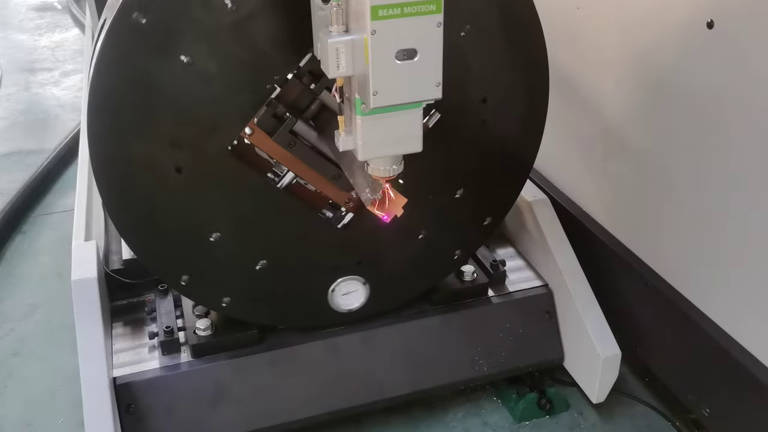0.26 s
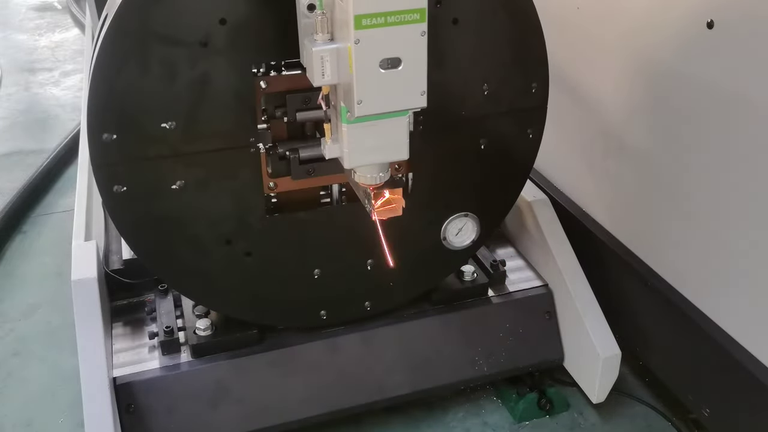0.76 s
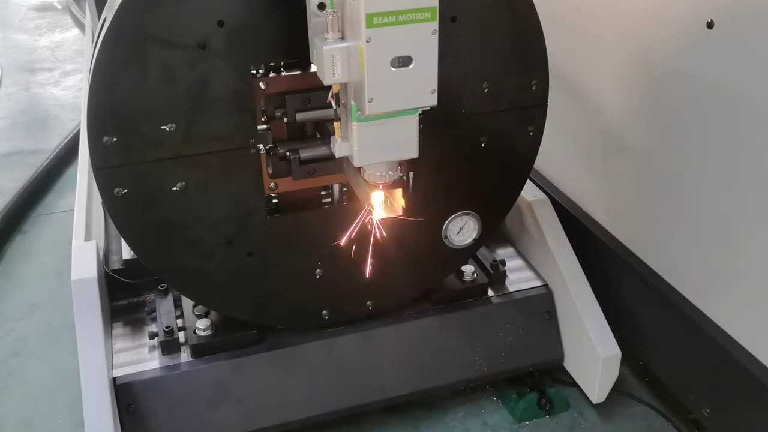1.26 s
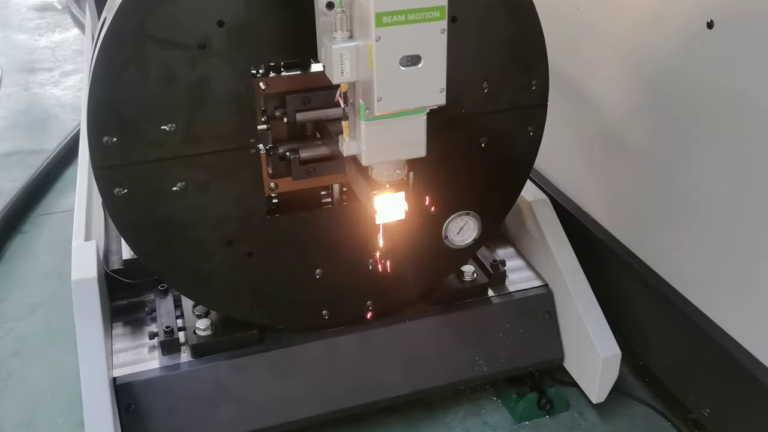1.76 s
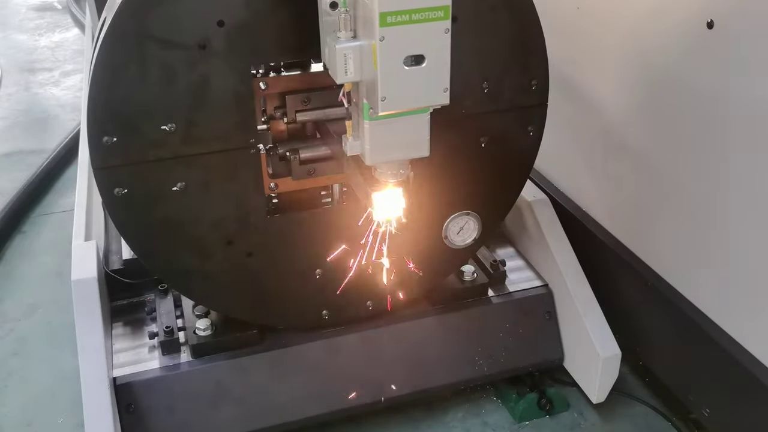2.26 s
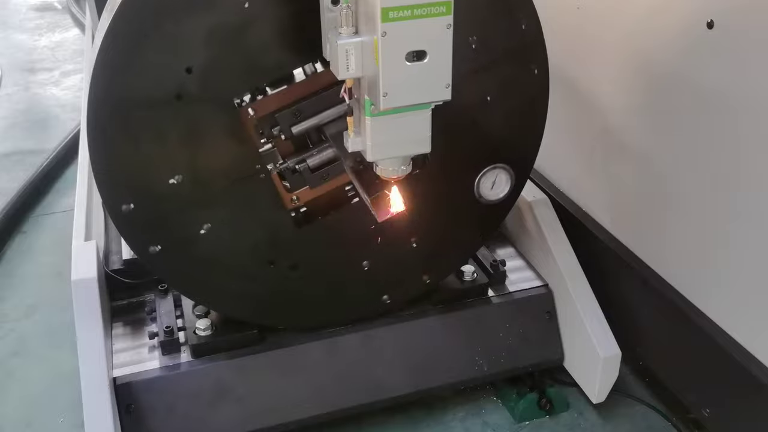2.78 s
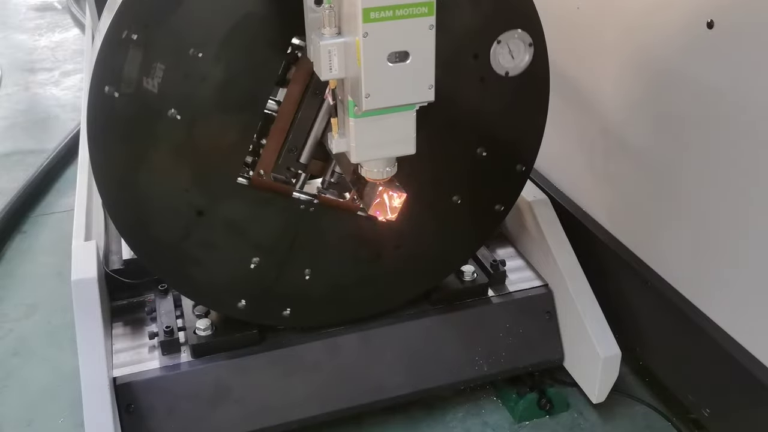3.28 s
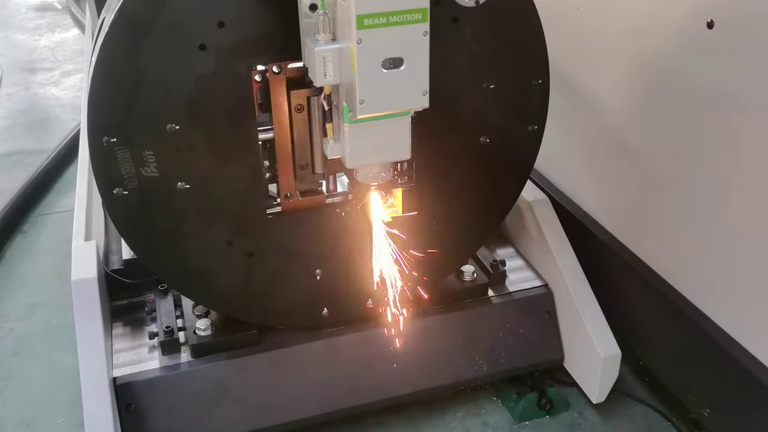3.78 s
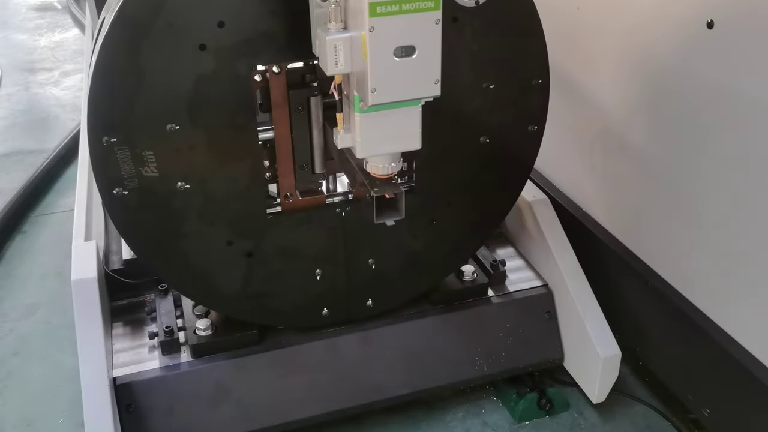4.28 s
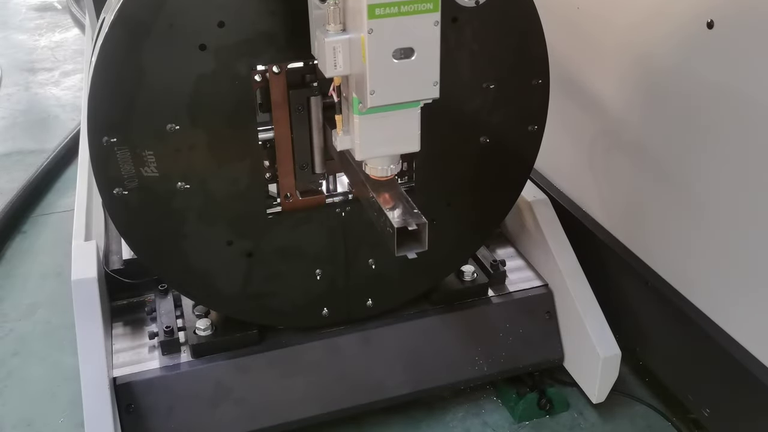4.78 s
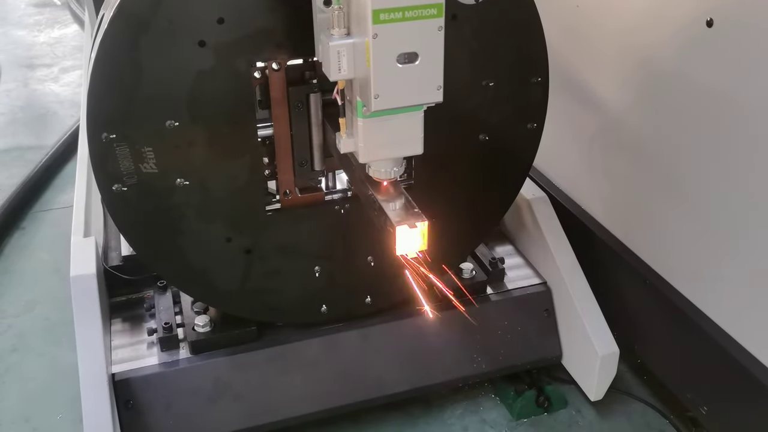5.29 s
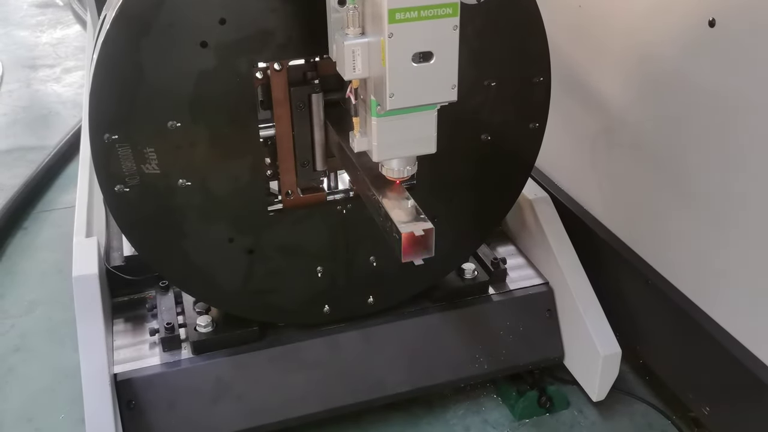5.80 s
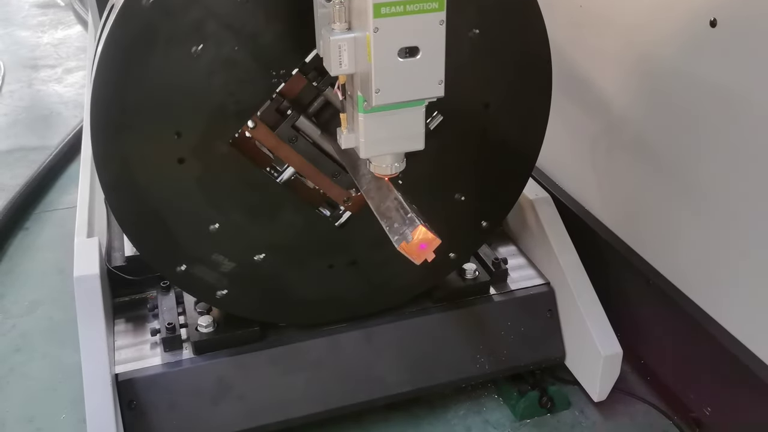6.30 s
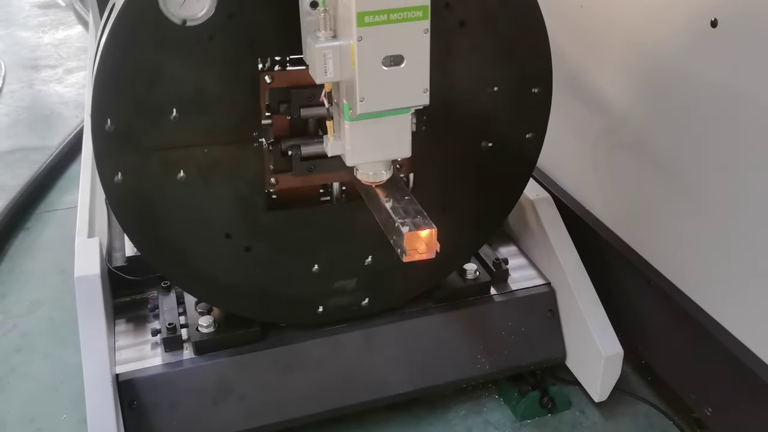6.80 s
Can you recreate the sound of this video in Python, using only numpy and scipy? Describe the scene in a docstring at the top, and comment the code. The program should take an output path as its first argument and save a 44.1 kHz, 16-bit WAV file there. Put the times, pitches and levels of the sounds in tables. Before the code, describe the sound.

Steady sharp gas hiss with a thin high whine, rumbling rushes of air on the right, and midway a small steel piece drops and rattles.

```python
"""Laser cutting of steel tube

A laser head cuts a turning square steel tube in a workshop, close to a phone with two microphones.
The gas jet is shaped noise that hisses on both sides, with a ring near 9 kHz on the left.
Gusts of low rush swell on the right, with a dark gap in the noise below a sliding edge.
A blast of air hits both microphones, then the cut piece drops and clatters: decaying sine modes
and noise cracks. Short puffs of filtered noise hit the right microphone."""
import sys
import numpy as np
from scipy import signal
from scipy.io import wavfile
from scipy.ndimage import uniform_filter1d

SR = 44100
rng = np.random.default_rng(int(sys.argv[2]) if len(sys.argv) > 2 else 0)


def output_pcm(signal):
    """Save a mono or channel-first signal as 16-bit PCM at the path in sys.argv[1].

    Samples are clipped to [-1, 1] before scaling.
    """
    pcm = np.clip(np.atleast_2d(signal).T, -1, 1) * 32767
    wavfile.write(sys.argv[1], SR, np.round(pcm).astype(np.int16))


def gain_from_db(level_db):
    """Convert decibel levels to linear amplitude factors (20 dB per decade)."""
    decades = np.asarray(level_db, float) / 20
    return 10 ** decades


N = 310905  # length in samples
HOP = 256  # half a short-time spectrum window, in samples

# strength of the gas jet close to the phone: time_s, level_db
JET_LEVEL = [(0, -32), (.15, -27.5), (.55, -28), (.91, -28), (1.03, -24), (2.3, -23.5), (2.7, -27.5),
             (2.83, -26.5), (2.88, -29.5), (3.4, -27), (3.75, -27.5), (3.83, -22), (4.08, -22), (4.14, -28),
             (4.42, -32.5), (4.78, -39.5), (4.9, -47.5), (4.96, -41.5), (5.04, -28), (5.21, -29.5),
             (5.6, -30), (5.68, -30.5), (5.71, -29), (6.0, -27), (6.13, -30), (6.67, -27), (6.86, -36),
             (6.91, -28.5), (7.04, -28)]
# broad hiss at each microphone, per kHz of band: pitch_hz, left_db, right_db
HISS_COLOUR = [(307, -40, -24.5), (1490, -14.5, -14), (3270, -10.5, -9.5), (4330, -7, -8),
               (5060, -10.5, -12.5), (6850, -7.5, -9.5), (9030, -0.5, -24), (9930, -11.5, -10),
               (12700, -7.5, -7), (16000, -11.5, -10)]
# spells of brighter hiss above the port's ring: start_s, end_s, boost_db
BRIGHT_SPELLS = [(.98, 2.85, 1.5), (3.8, 4.12, 1.5), (5.7, 6.05, 3.5)]
PORT_HZ, PORT_WIDTH_HZ = 8685, 1800  # ring of the left port, 6 dB down at the ends of its width
RING_OVER_JET_DB = 4.0
GUST_MASKS_DB = -2  # change of the broad hiss at the strongest gust


def jet():
    """Turbulence of the gas jet: broad hiss at both microphones, and a resonance of the left port."""
    hz, t, noise = spectra(turbulence(lean=0.03, flicker_db=0.61, flicker_s=0.03))
    jet_db = follow(JET_LEVEL, t)[0]
    gust = np.sqrt(gusts(t))
    hiss_db = jet_db + GUST_MASKS_DB * gust / gust.max()

    # surges of the jet are mostly treble, so the lower band rises less
    treble_from_hz = PORT_HZ + PORT_WIDTH_HZ / 2
    surge_db = np.maximum(hiss_db + 29, 0)
    lower_cut_db = 0.43 * np.outer(hz < treble_from_hz, surge_db)
    power = gain_from_db(read(HISS_COLOUR, hz) + hiss_db - lower_cut_db) ** 2
    bright_db = sum(db * ((t > start) & (t < end)) for start, end, db in BRIGHT_SPELLS)
    power *= gain_from_db(np.outer(hz > treble_from_hz, bright_db)) ** 2

    port = 1 / (1 + ((hz - PORT_HZ) / PORT_WIDTH_HZ * 2) ** 4)  # a flat-topped resonance
    ring_power = gain_from_db(RING_OVER_JET_DB + jet_db) ** 2
    power[0] += np.outer(port ** 2 * 1000 / PORT_WIDTH_HZ, ring_power)
    return sound(noise * np.sqrt(power))


# colour of the rush at each microphone, per kHz of band: pitch_hz, left_db, right_db
RUSH_COLOUR = [(20, -10, -26), (89, -3, 1), (980, -4, -1.5), (2500, -5.5, -1.5), (4480, -9.5, -3.5),
               (4560, -13, -8), (7200, -17.5, -11.5), (8800, -24, -24.5), (9260, -34, -16.5),
               (12000, -26, -11.5), (16100, -18, -12)]
# change of the right rush under the edge of the gap: pitch_hz, level_db
GAP_COLOUR = [(60, -3), (250, -8), (700, -18), (1300, -42), (4000, -37)]


def rush():
    """Buffeting air, strongest under 4.5 kHz; on the right a gap opens under a sliding edge."""
    hz, t, noise = spectra(turbulence(lean=0.14, flicker_db=1.27, flicker_s=0.023))
    # the right microphone shares a little of the left air, two samples later
    noise[1] += 0.19 * noise[0] * np.exp(-4j * np.pi * hz / SR)[:, None]
    power = draught(t) + blast(t)
    power[1] += gusts(t)
    level_db = read(RUSH_COLOUR, hz) + 10 * np.log10(power)[:, None]

    wobble = uniform_filter1d(rng.standard_normal(len(t)), size=7)
    edge_hz = gap_edge(t)
    ragged_hz = edge_hz + np.minimum(edge_hz, 1500) * 0.17 * wobble
    under = np.clip((ragged_hz - hz[:, None]) / 220, 0, 1)  # the gap is full 220 Hz below its edge
    level_db[1] += under * read(GAP_COLOUR, hz)[0]
    left, right = noise * gain_from_db(level_db)
    right = right + gain_from_db(-8.5) * under * left  # the left rush fills the gap
    return sound(np.array([left, right]))


# climbs of the gap's edge at the right microphone: start_s, top_s, end_s, top_hz
EDGE_CLIMBS = [(.33, .74, .76, 2650), (1.15, 1.3, 1.35, 2050), (1.37, 1.63, 1.66, 2100),
               (2.56, 2.84, 2.87, 3300), (3.1, 3.17, 3.27, 2250), (3.24, 3.34, 3.44, 3900),
               (3.47, 3.52, 3.54, 2370), (3.9, 3.97, 4.2, 1780), (4.9, 5.18, 5.42, 2150),
               (5.44, 5.56, 5.58, 2050), (5.6, 5.67, 5.7, 2250), (6.12, 6.26, 6.5, 2050),
               (6.55, 6.68, 7.1, 1900), (6.68, 6.72, 6.75, 2900)]
# spells without the gap: start_s, end_s
NO_GAP_SPELLS = [(-1, .395), (4.17, 4.84)]
EDGE_REST_HZ, EDGE_DROP_S = 1444, 0.04
GAP_RETURNS_S = 0.018  # time constant


def gap_edge(t):
    """Upper edge of the gap in Hz: it climbs from rest, holds and drops back."""
    climbs_hz = []
    for start, top, end, top_hz in EDGE_CLIMBS:
        climb = np.interp(t, [start, top, end, end + EDGE_DROP_S], [0, 1, 1, 0])
        climbs_hz.append(climb * (top_hz - EDGE_REST_HZ))
    hz = EDGE_REST_HZ + np.max(climbs_hz, axis=0)
    for start, end in NO_GAP_SPELLS:
        back = 1 - np.exp(-np.maximum(t - end, 0) / GAP_RETURNS_S)
        hz = hz * np.where(t < start, 1, back)
    return hz


# gusts thrown at the right microphone: start_s, full_s, end_s, level_db
GUST_ROWS = [(.13, .46, .727, -15.3), (2.58, 2.64, 2.845, -22), (3.04, 3.37, 3.435, -14.8),
             (3.42, 3.5, 3.575, -27), (3.72, 3.81, 3.83, -29), (3.84, 3.98, 4.1, -26.5),
             (4.96, 5.07, 5.47, -23.5), (5.3, 5.53, 5.625, -22.5), (6.7, 6.8, 6.84, -34)]


def gusts(t):
    """Summed power of the gusts of air, before the colour of the rush."""
    return sum(swell(t, *row, fall_s=0.03) for row in GUST_ROWS)


# blast of air, left microphone then right: start_s, full_s, end_s, level_db, fall_s
BLAST_ROWS = [(4.168, 4.194, 4.74, -18, 0.088), (4.156, 4.191, 4.785, -16.5, 0.048)]


def blast(t):
    """Power of the blast of air at each microphone, before the colour of the rush."""
    return np.array([swell(t, *row) for row in BLAST_ROWS])


# ringing modes of the cut piece of tube, t60 before damping: pitch_hz, level_db, t60_s
PIECE_MODES = [(1070, -15, 3), (1416, -12, 3), (1590, -16, 1.5), (1927, -7, 1), (2153, -9, 1),
               (2196, -4, 1), (2229, -5, 1.5), (2293, -8, .6), (2376, -5, .8), (2575, -3, .25),
               (2751, -3, .2), (2940, -10, .5), (3352, -6, .8), (3607, -6, 1), (3795, -5, .8),
               (3912, -7, .5), (4360, -12, .5), (4737, -10, .3), (5163, -3, .3), (5400, -5, .4),
               (5597, -6, .5), (6065, -5, .15), (6225, -6, .2), (6550, -5, .4), (6955, -7, .4),
               (7461, -3, .5), (7588, -2, .4), (7960, -2, .4), (8538, 0, .3), (8895, -2, .2)]
# its blows on the tray: start_s, level_db, spread_octaves, low_hardest_hz, high_hardest_hz
TRAY_BLOWS = [(4.86, -33, .45, 1070, 1070), (4.943, -38, 1.2, 4360, 5597), (4.977, -28, .4, 2575, 2751),
              (5.021, -18, 2.4, 1927, 6065), (5.05, -21, 1.8, 2575, 5597), (5.112, -18, 1.2, 2376, 2575),
              (5.14, -18.5, 1.5, 2229, 6225), (5.19, -22.5, 2.3, 2229, 6955),
              (5.23, -23.5, 1.4, 1416, 2229), (5.262, -21.5, 1.3, 2229, 6225), (5.31, -27, .9, 1070, 2229),
              (5.335, -28, .98, 2293, 2575)]
PIECE_RESTS_S = 5.37


def clatter():
    """Each blow cracks and rings the modes; each later contact damps them, until the piece lies still."""
    hz, mode_db, t60 = np.transpose(PIECE_MODES)[..., None]
    t = np.arange(SR // 2) / SR
    out = np.zeros((2, N))
    contacts = np.transpose(TRAY_BLOWS)[0]
    for s, blow_db, octaves, *hardest_hz in TRAY_BLOWS:
        # brightest between the two hardest modes, nearer the high one
        bright_hz = hardest_hz[0] * (hardest_hz[1] / hardest_hz[0]) ** 0.71
        share_db = mode_db - 6.3 * (np.log2(hz / bright_hz) / octaves) ** 2
        share_db += 9.4 * np.exp(-((hz - hardest_hz) / 60) ** 2).max(1, keepdims=True)
        share_db += 1.6 * rng.standard_normal(hz.shape)  # each blow lands on another spot

        later = sum(np.clip((s + t - c) / 0.004, 0, 1) for c in contacts[contacts > s]) + 0 * t
        damping_db = 5.5 * later * np.clip(hz / 2600, 0, 1.3) ** 2  # low modes ring through
        phase = 2 * np.pi * rng.random((len(hz), 1))
        phase = phase + 1.22 * rng.standard_normal((2, len(hz), 1))  # unlike at each microphone
        decay = gain_from_db(share_db - damping_db - 60 * t / t60)
        ring = (decay * np.sin(2 * np.pi * hz * t + phase)).sum(1)

        crack = rng.standard_normal((2, len(t))) * gain_from_db(-60 * t / 0.055)
        rest = gain_from_db(-60 * np.maximum(s + t - PIECE_RESTS_S, 0) / 0.099)
        onset = np.minimum(t / 0.0013, 1)
        out[:, round(s * SR):][:, :len(t)] += gain_from_db(blow_db) * (ring + crack) * rest * onset
    return out * gain_from_db(np.array([[-3.0], [-4.0]]))  # left, right


# short puffs at the right microphone, level before fading in and out: middle_s, level_db, lowest_hz, length_s
PUFF_ROWS = [(0.784, -20, 1610, 0.013), (6.038, -19, 60, 0.0065), (6.061, -17, 60, 0.0056),
             (6.588, -17.5, 60, .009), (6.615, -20.5, 2100, .014)]


def puffs():
    """Brief bursts of air on the right microphone: band-passed noise under a smooth hump."""
    out = np.zeros((2, N))
    for s, db, low_hz, length in PUFF_ROWS:
        count = round(length * SR)
        band = signal.butter(3, [low_hz, 4600], "band", fs=SR, output="sos")
        puff = signal.sosfilt(band, rng.standard_normal(2000))[-count:]
        puff = gain_from_db(db) * puff / puff.std() * np.hanning(count)
        out[1, round(s * SR) - count // 2:][:count] += puff
    return out


# weak draught of air around the phone: time_s, left_db, right_db
DRAUGHT_LEVEL = [(0, -40.5, -33), (.72, -39.5, -55), (.9, -45, -41), (1.07, -45, -38), (1.21, -36.5, -30.5),
                 (1.61, -39, -26), (1.8, -40.5, -32), (2.23, -37.5, -30), (2.48, -47, -43),
                 (2.66, -38.5, -26), (3.06, -39.5, -36.5), (3.4, -43, -33), (3.71, -43, -46),
                 (4.0, -37, -36), (4.17, -37, -30.5), (4.84, -48, -43), (4.93, -48, -54), (5.03, -40, -33),
                 (5.55, -32, -26.5), (5.78, -47.5, -40), (5.89, -56, -48), (6.04, -34, -33.5),
                 (6.1, -37.5, -33.5), (6.4, -42.5, -34), (7.04, -42, -30.5)]


def draught(t):
    """Power of the weak draught at each microphone, before the colour of the rush."""
    return gain_from_db(np.array(follow(DRAUGHT_LEVEL, t))) ** 2


def swell(t, start, full, end, db, fall_s):
    """Power of a push of air that grows steadily in dB, holds, and dies away steadily in dB."""
    rise = np.clip((full - t) / (full - start), 0, 3)
    fall = np.clip((t - end) / fall_s, 0, 3)
    return gain_from_db(db - 24 * (rise + fall)) ** 2  # 24 dB from start to full, and per fall_s


def turbulence(lean, flicker_db, flicker_s):
    """Two unrelated white noises, about unit power per kHz, with lopsided peaks and a shared flicker."""
    noise = rng.standard_normal((2, N))
    slow = uniform_filter1d(rng.standard_normal(N), round(flicker_s * SR))
    noise = (noise + lean * (noise ** 2 - 1)) / np.sqrt(1 + 2 * lean ** 2)
    return noise * gain_from_db(flicker_db * slow / slow.std()) * np.sqrt(SR / 2000)


def read(points, hz):
    """Columns of a spectrum table at the given frequencies, shape (columns, bins, 1)."""
    f, *columns = np.transpose(points)
    return np.array([np.interp(np.log(hz + 1), np.log(f + 1), c) for c in columns])[..., None]


def follow(rows, t):
    """Columns of a curve table at the given times."""
    s, *columns = np.transpose(rows)
    return [np.interp(t, s, c) for c in columns]


def spectra(x):
    """Frequencies, times and short-time spectra of x."""
    return signal.stft(x, SR, nperseg=2 * HOP, noverlap=3 * HOP // 2)


def sound(z):
    """Back from short-time spectra to samples."""
    return signal.istft(z, SR, nperseg=2 * HOP, noverlap=3 * HOP // 2)[1][..., :N]


def scene():
    """Jet, rush, puffs and falling piece."""
    return jet() + rush() + puffs() + clatter()


def band_limit(x):
    """A steep low-pass at the top of the band."""
    return signal.sosfilt(signal.butter(12, 16960, fs=SR, output="sos"), x)


def record(dry):
    """Peaks round off a little below full scale, then the band ends at 15.85 kHz."""
    rounded = np.tanh((1.105 * abs(dry)) ** 3) ** (1 / 3) * np.sign(dry) / 1.095
    band = signal.firwin(511, 15850, window=("kaiser", 9), fs=SR)
    mix = signal.oaconvolve(rounded, band[None], "same")
    return band_limit(mix)


dry = scene()
out = record(dry)
output_pcm(out)
```